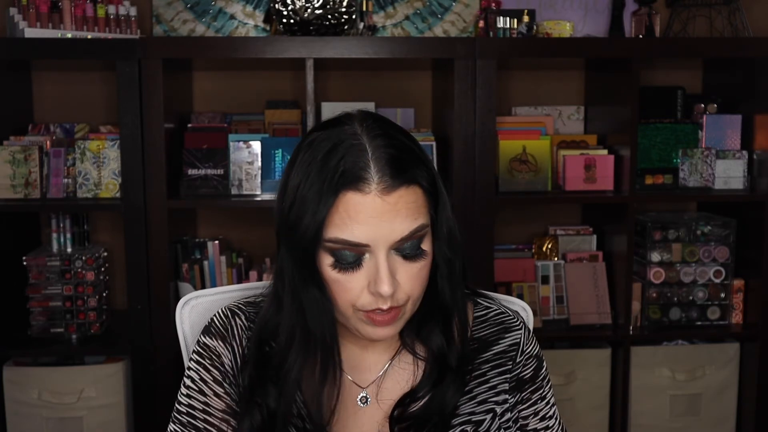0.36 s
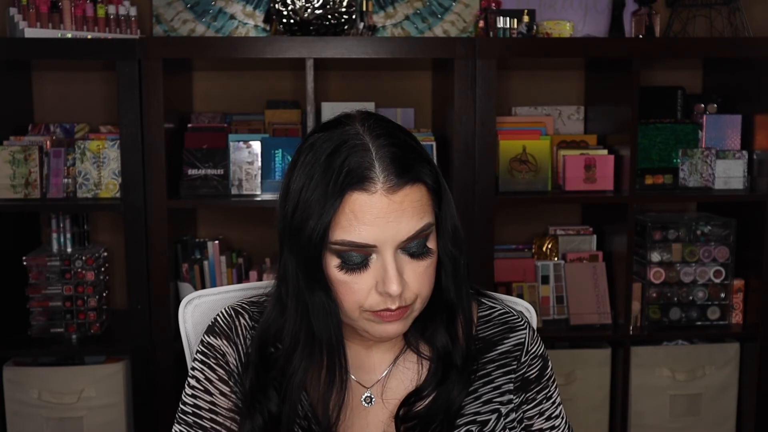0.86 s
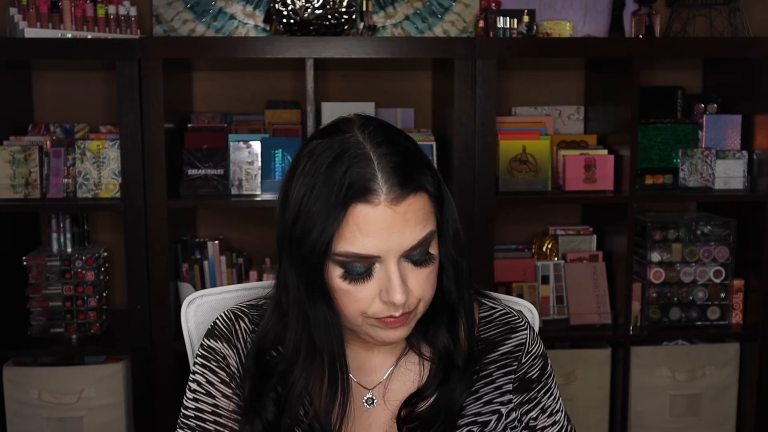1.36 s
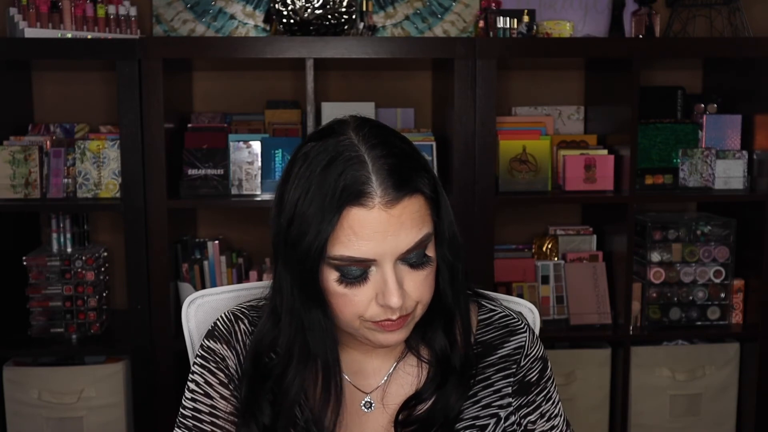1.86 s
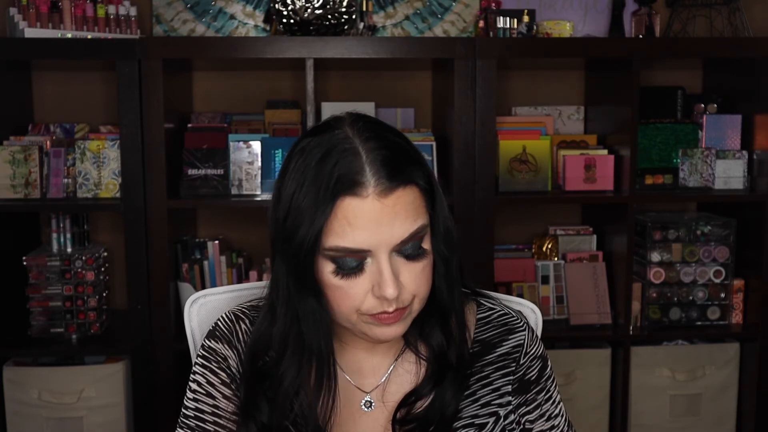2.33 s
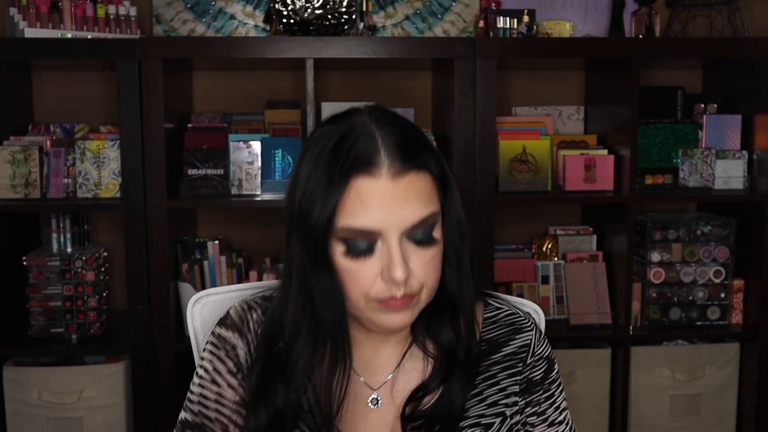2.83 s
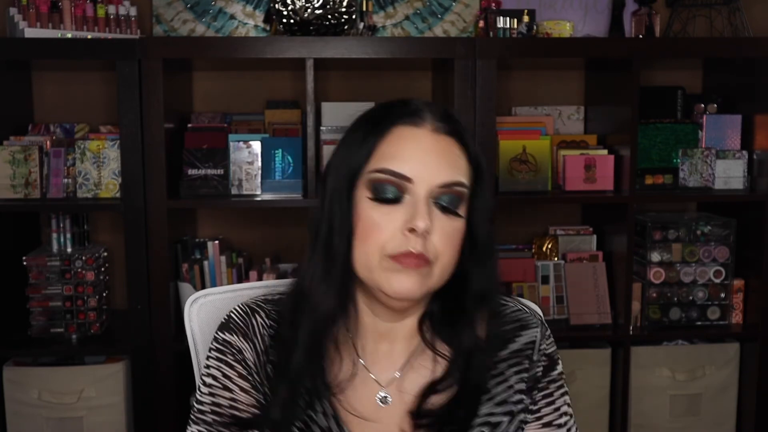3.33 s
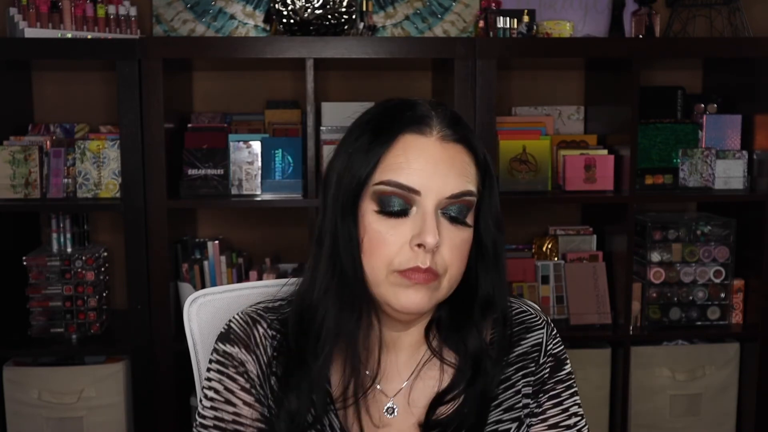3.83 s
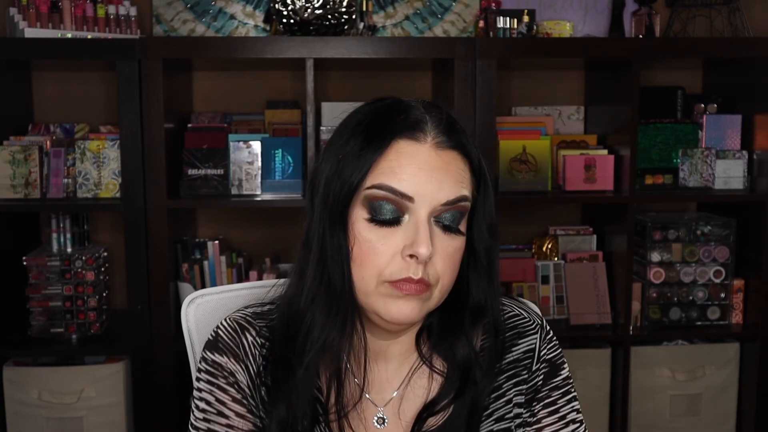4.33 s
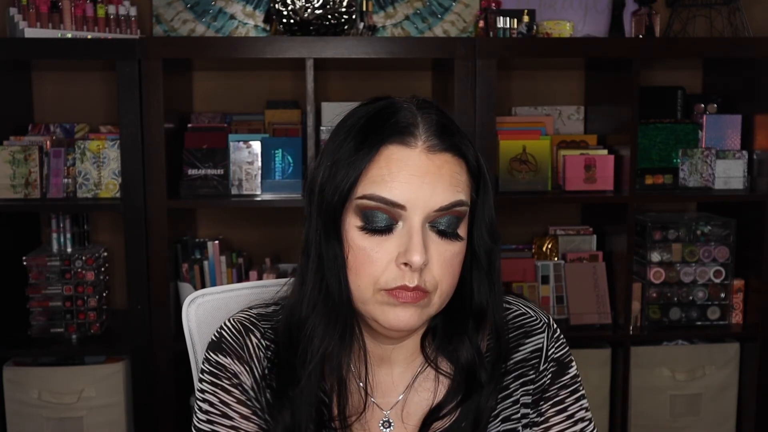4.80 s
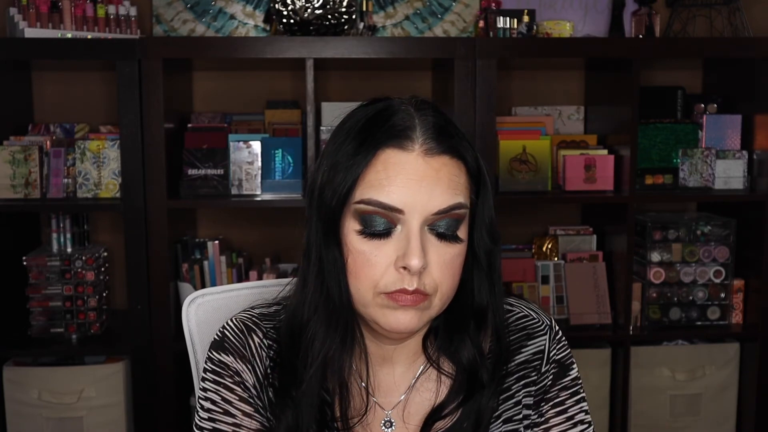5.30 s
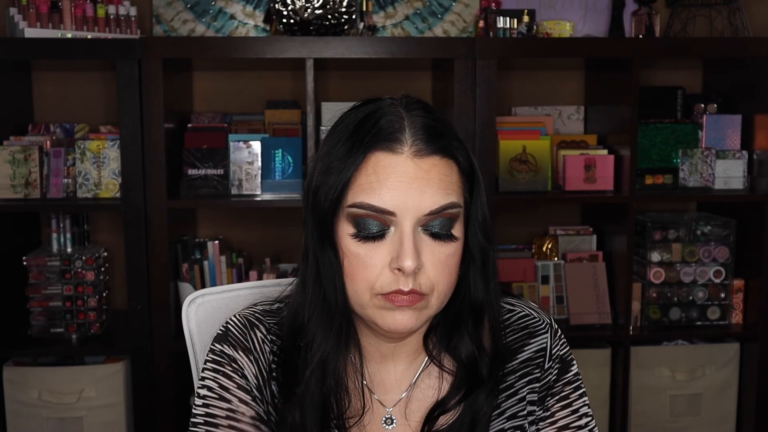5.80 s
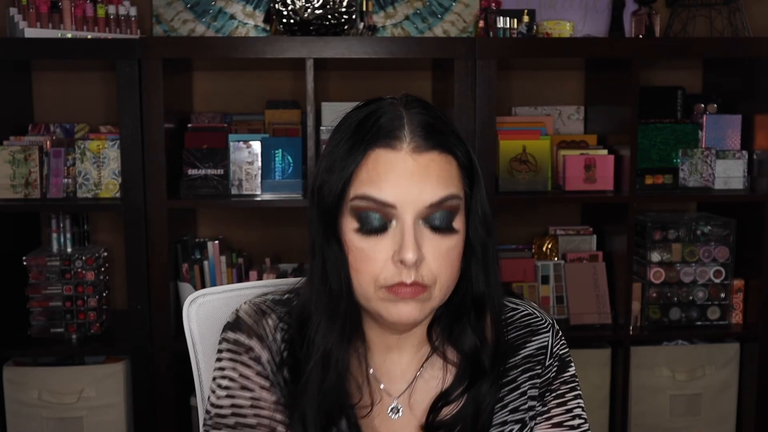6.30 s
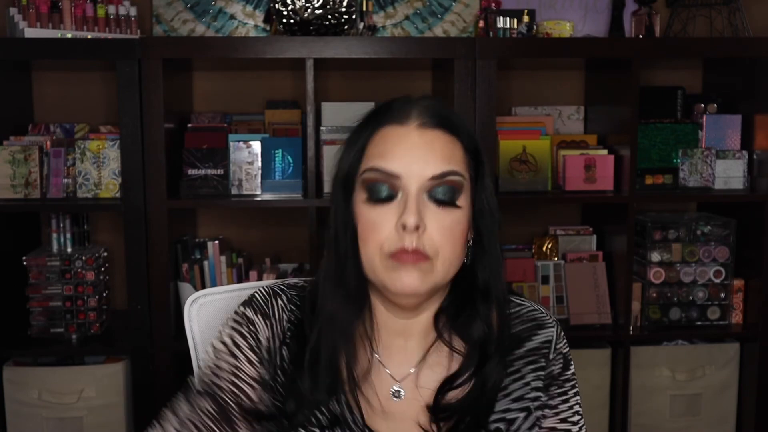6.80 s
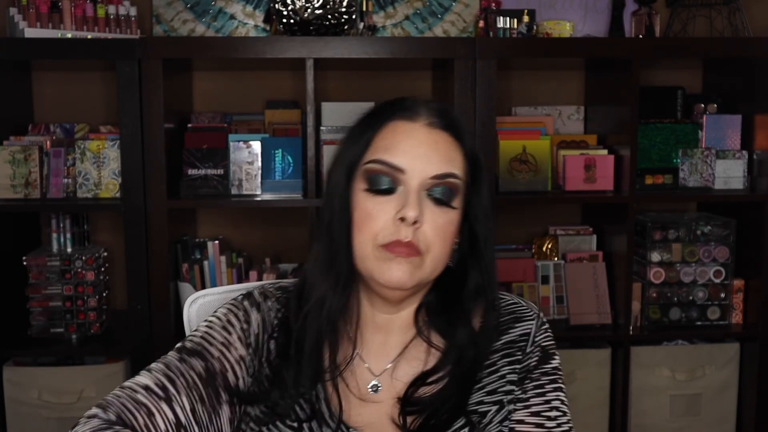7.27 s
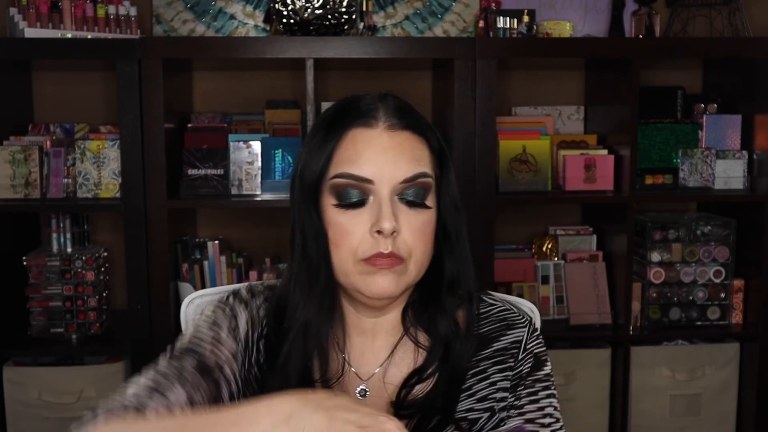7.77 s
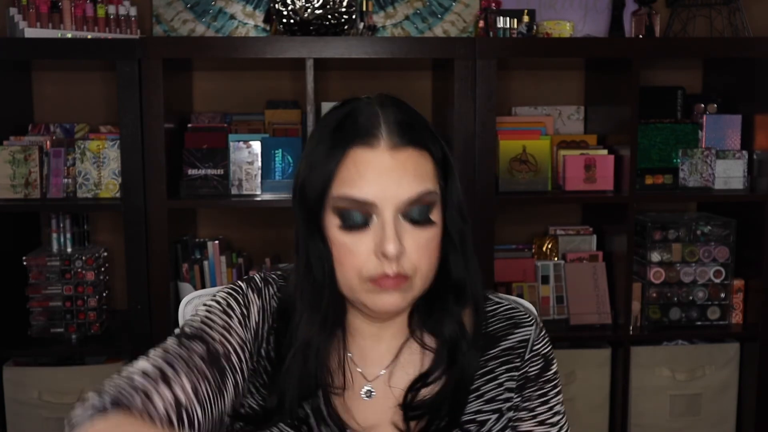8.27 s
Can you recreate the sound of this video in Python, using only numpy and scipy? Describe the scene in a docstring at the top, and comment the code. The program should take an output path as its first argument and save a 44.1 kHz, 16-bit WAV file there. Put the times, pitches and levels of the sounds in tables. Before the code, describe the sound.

Close dry packaging rustle with sharp clicks, peaking in a dense flurry of snaps and box knocks, then near quiet and a small plastic tap.

```python
"""Stiff plastic film crinkles and snaps as hands unwrap a small palette near a mono microphone in a furnished room.
The card box knocks, scuffs and bumps the desk; the plastic case is dragged a little and set down.
Rustle is dense damped pops and filtered clicks, snaps and rubs are noise bursts ringing film and box, bumps are
low sines, drag and taps ring the case. The room answers for a third of a second; the loudest snaps clip.
Under it all lie filtered noise as room rumble and preamp hiss, a mains hum and a thin sine whine."""
import sys
import numpy as np
from scipy import signal
from scipy.fft import rfft, irfft, next_fast_len
from scipy.io import wavfile

SR = 44100
rng = np.random.default_rng(int(sys.argv[2]) if len(sys.argv) > 2 else 0)


def unload_audio(sound):
    """Save the sound as a 16-bit wav file, at the path given as the first command line argument."""
    columns = np.transpose(np.atleast_2d(sound))
    # keep every value between -1 and 1, then stretch to whole-number steps
    steps = np.round(np.clip(columns, -1, 1) * 32767)
    wavfile.write(sys.argv[1], SR, steps.astype(np.int16))


def magnitude_from_level(level_db):
    """Linear magnitude for a level in decibels (20 dB per decade)."""
    exponent = np.asarray(level_db, float) / 20
    return 10 ** exponent


N = 381068  # length in samples

# Source levels are those ahead of the mix and the microphone; shares and colours are relative.
# finger strokes that crumple the film: (time of peak [s], rise [s], level [dB], pitch [Hz], fizz share [dB])
STROKES = [(0.0, .05, -32, 4370, -10), (.142, 0.18, -36, 4950, -12), (.2, 0.24, -37.5, 4900, 4.5),
           (0.264, 0.067, -28, 3770, -5.5), (.356, 0.11, -40, 4000, -24), (.508, 0.42, -40, 3430, -4),
           (.57, 0.24, -38, 2400, -25), (0.648, 0.14, -35, 3540, -19), (.714, 0.22, -29, 3970, -4),
           (.8, 0.24, -33, 2800, -11), (1.075, 0.16, -28, 3370, -10), (1.093, 0.015, -17, 3570, -30),
           (1.125, 0.051, -20, 3800, -14), (1.445, 0.072, -51, 2310, 2), (1.481, 0.19, -35, 4130, 4),
           (1.55, 0.29, -41, 2900, -1), (1.623, 0.57, -36.5, 4300, -6), (1.703, 0.0076, -32.5, 3320, -25),
           (1.813, 0.15, -35.5, 4350, -3), (1.917, 0.11, -35.5, 2600, -3), (1.995, 0.17, -29.5, 3940, -6),
           (2.023, 0.008, -18, 4800, -20), (2.179, 0.077, -33, 4050, -20), (2.235, 0.0067, -24, 2660, -31),
           (2.441, 0.14, -26, 3900, -5), (2.495, 0.29, -27, 4130, -20), (2.547, 0.015, -24, 3570, -30),
           (2.637, 0.13, -25, 4500, -11), (2.71, 0.26, -30, 4100, -7), (2.861, 0.096, -26.5, 2740, -10),
           (2.958, 0.15, -24, 4000, -2), (3.039, 0.011, -24.5, 2870, 2), (3.125, .3, -26, 3080, -3),
           (3.27, 0.011, -33, 3740, -3), (3.355, 0.032, -24, 3300, -4), (3.568, 0.64, -40.5, 4500, -19),
           (3.808, 0.088, -25.5, 5300, -16), (3.959, 0.017, -30, 1550, -23), (4.0, .03, -49, 3000, -12),
           (4.04, 0.049, -36, 3370, -20), (4.102, 0.3, -30.5, 4350, -11), (4.27, .4, -42.5, 4220, -20),
           (4.342, 0.17, -47.5, 5060, 6), (4.412, 0.16, -40.5, 2860, -21), (4.545, 0.0084, -15, 4200, -2.5),
           (4.568, 0.018, -14.5, 3520, -5), (4.595, 0.035, -15.5, 3920, -7),
           (4.625, 0.057, -13.5, 4730, -4), (4.655, .04, -15, 3000, -7), (4.684, 0.061, -17, 1700, -18),
           (4.712, 0.056, -20.5, 1730, -24), (4.83, 0.039, -24.5, 3150, -18),
           (4.922, 0.048, -23, 2880, -20), (4.96, 0.08, -21, 3930, -6), (5.034, 0.18, -35, 4800, -1),
           (5.096, 0.024, -24, 3100, -12), (5.19, 0.023, -23, 4500, -10), (5.272, 0.12, -31, 4920, -9),
           (5.35, 0.35, -32, 4930, -9), (5.435, 0.07, -32.5, 4200, -12), (5.485, 0.037, -33.5, 4500, -5),
           (5.55, 0.13, -49, 4400, -8), (5.598, 0.086, -28, 5040, -5), (5.65, .1, -47, 4970, -7),
           (5.738, 0.0071, -22.5, 6000, -7), (5.81, .2, -35, 5000, -10), (5.991, 0.36, -30, 5230, -25),
           (6.07, .2, -34, 5400, -5), (6.14, 0.14, -35, 4110, 0), (6.181, 0.024, -25.5, 1620, -27),
           (6.222, 0.0087, -15, 2040, -13), (6.396, .4, -31.5, 4130, -5), (6.45, 0.065, -26, 3350, -7),
           (6.551, 0.018, -20.5, 2000, -8), (6.747, 0.16, -39, 3980, -3), (6.8, 0.11, -42, 3800, -12),
           (6.99, 0.11, -48.5, 3700, -14), (7.115, 0.27, -47, 1550, 2), (7.205, 0.15, -46.5, 2590, 3),
           (8.187, 0.2, -42.5, 3880, -17), (8.333, 0.33, -51, 2090, -17), (8.41, 0.31, -45, 2080, -20),
           (8.51, 0.23, -44, 2630, -21)]
# fingers scuff the card box: (time of peak [s], rise [s], level [dB])
SCUFFS = [(0.549, .5, -43), (1.095, 0.027, -17), (1.47, 0.19, -37.5), (1.71, .02, -43), (1.995, 0.18, -34),
          (2.72, 0.092, -33), (2.77, .1, -48), (3.125, 0.11, -37), (3.355, 0.075, -29), (3.55, .5, -46),
          (3.93, 0.65, -38.5), (4.41, 0.35, -61), (4.56, .015, -33), (4.62, .05, -25), (4.665, .05, -20),
          (4.71, .06, -17.5), (4.9, 0.33, -28), (5.06, .4, -33.5), (5.35, .3, -42), (5.485, .06, -48),
          (5.737, 0.017, -40), (6.015, 0.047, -27), (6.155, 0.14, -35), (6.237, 0.037, -15.5),
          (6.535, .4, -42), (7.46, .5, -54), (8.34, 0.24, -47), (8.42, 0.43, -44.5)]
# snaps and knocks: (time [s], peak level [dB], ring [Hz], card share [dB], fizz share [dB])
SNAPS = [(0.031, -26, 2430, -10, -1), (.193, -32, 5700, -31, -12), (.47, -27, 3100, -25, -38),
         (.705, -27, 5270, -19, -19), (.758, -25, 1300, -24, -1), (1.053, -30, 3260, -10, -10),
         (1.086, 0, 2030, -13, -14), (1.343, -40, 580, 18, -38), (1.43, -48, 1720, -17, -38),
         (1.437, -26, 1930, -16, -4), (1.522, -27, 1820, -12, 0), (1.555, -28, 2970, -15, -13),
         (1.709, -25.5, 1060, -8, -11), (1.801, -30, 5430, -11, -8), (1.923, -23, 1460, -10, -38),
         (2.004, -1.5, 3830, -26, -21), (2.227, -9, 3060, -15, -59), (2.389, -37, 4100, 1, -24),
         (2.183, -41, 595, -21, -25), (2.441, -16.5, 3870, -25, -26), (2.537, -5, 4320, -20.5, -54),
         (2.835, -26.5, 2780, -23, -16), (2.857, -24, 3100, -8.5, -11), (2.998, -18, 4900, -27, 0),
         (3.264, -33, 5840, -15, -27), (3.275, -28.5, 1020, -39, -22), (3.337, -19.5, 980, -22, -14),
         (3.759, -24.5, 4500, -25, -6), (3.956, -23, 1240, 13, -30.5), (4.322, -28, 5200, -33, 1.5),
         (4.541, -3, 4760, -11, -35), (4.55, -20, 4490, -25, -26), (4.574, -6.5, 2080, -25, -17),
         (4.636, -3, 6460, -4.5, 2), (4.677, -2.5, 1670, -40, -32), (4.715, -30, 1510, -17, -30),
         (4.768, -22, 4950, -28, -20), (4.79, -7, 4300, -11, -13), (4.823, -11, 614, -10, -13),
         (4.891, 1, 754, -0.5, -2.5), (4.894, 0, 4330, -35, -8), (4.952, -11.5, 4740, -8, -18),
         (4.972, -9, 2780, -9, -9), (5.001, -9.5, 6060, -34, 8), (5.047, -25, 590, -8, -30),
         (5.092, -21, 1164, 2, -16), (5.098, -14, 600, -29, -8), (5.109, -16, 680, 2, 1),
         (5.178, -13, 4760, -13.5, -8), (5.202, -15.5, 3950, -15.5, -5), (5.272, -13, 5080, -11, -31),
         (5.303, -12.5, 5000, -12.5, -36), (5.426, -13.5, 880, -8, -11), (5.439, -30, 1010, -22, -25),
         (5.471, -22.5, 5600, -34, -23), (5.485, -18, 4200, -31, -1), (5.621, -24, 5300, -26, -3),
         (5.628, -11, 4880, -29, -8), (5.655, -13.5, 5720, -12, -26), (5.692, -10.5, 6000, -26, -39),
         (5.74, -9, 6150, -15.5, -16), (5.773, -13.5, 5600, -12.5, -7), (5.826, -14.5, 5180, -7, -6),
         (5.862, -23.5, 1360, -12, -27), (5.914, -13.5, 5250, -10.5, -31), (5.938, -10, 5400, -14.5, -28),
         (5.986, -16.5, 605, -30, -5), (6.05, -22.5, 5780, -17, -31), (6.091, -17, 4600, -13, -6.5),
         (6.217, -6, 970, -15, -23), (6.321, -25.5, 853, -1, -14), (6.37, -27, 1790, -7, -24),
         (6.398, -19.5, 533, -32, -22), (6.411, -14.5, 3920, -12, -8), (6.417, -17, 567, -30, -11),
         (6.45, -23, 2640, -10, -23), (6.505, -21, 3670, -16, -6), (6.545, -6, 480, -1, -12),
         (6.567, -17.5, 820, 14, -31), (7.604, -17, 3580, -1, 1), (7.686, -39, 910, -4, -18)]
# short rubs that swell: (time partway up the swell [s], peak level [dB], ring [Hz], card share [dB], fizz share [dB])
RUBS = [(0.259, -35, 2520, -10, -19), (3.043, -16, 2430, -40, -23), (3.082, -16, 3340, -30, -20),
        (3.116, -13.5, 2960, -46, -29), (3.803, -22, 5740, -28, -31), (3.807, -27, 900, -22, -40),
        (3.823, -18, 5750, -27, -34), (3.826, -24, 850, -20, -40), (4.084, -21, 5100, -0.5, 1),
        (5.645, -17, 4850, -15, -27), (5.707, -21, 5860, -31, -23), (6.165, -10.5, 1880, -7.5, -41)]
# short one-sided low thumps from lopsided clipping of the hardest snaps: (time [s], peak level [dB])
LOPSIDED_CLIPS = [(2.005, -18), (4.542, -25), (4.895, -10)]
# the box bumps the desk: (time [s], starting level [dB], pitch [Hz])
THUDS = [(4.891, -18, 197), (5.1, -19, 254), (5.69, -31, 145), (5.909, -28, 248), (6.214, -22, 194),
         (6.391, -23.5, 258), (6.547, -17.5, 230), (7.605, -30, 325)]
# the plastic case touches the desk: (time [s], peak level [dB])
TAPS = [(7.604, -19), (7.683, -29), (7.692, -35)]
# the plastic case is dragged on the desk: (time [s], level [dB])
DRAG = [(7.02, -51.5), (7.13, -34.5), (7.158, -57), (7.19, -40), (7.208, -43), (7.238, -67), (7.26, -66)]
# broad resonances of the film: (frequency [Hz], width [Hz], level [dB])
FILM_MODES = [(1840, 950, 14.5), (3620, 2250, 14), (5600, 1570, 15.5)]
# resonances of the card box: (frequency [Hz], width [Hz], level [dB])
CARD_MODES = [(341, 197, -3.5), (619, 115, 1), (733, 274, 0.5), (1195, 624, -0.5)]
# the finest creases when they snap: (frequency [Hz], width [Hz], level [dB])
FIZZ_MODES = [(7300, 18000, 14), (12500, 8100, 10.5), (14500, 1100, -6)]
# resonances of the plastic case: (frequency [Hz], width [Hz], level [dB])
CASE_MODES = [(1100, 45, 0.5), (1360, 110, -0.5), (2390, 120, -8), (3000, 200, -6), (4300, 200, -10),
              (5750, 210, -8)]
# rustle of the finest creases: (frequency [Hz], density [dB per Hz])
FINE_COLOUR = [(5000, -31), (7000, 5), (8500, -1.5), (12000, 8), (15500, -2), (18000, -28)]
# decay of the room: (frequency [Hz], time to fall 60 dB [s])
ROOM_DECAY = [(200, 0.23), (1400, 0.15), (3700, 0.25), (9700, 0.44)]
# colour of the room's answer: (frequency [Hz], level [dB])
WALLS = [(150, -4.5), (500, 4), (2000, -4), (6000, -6), (8500, -12.5), (16000, -4)]
# response of the microphone: (frequency [Hz], level [dB])
MIC = [(40, -2.5), (5500, 6), (8000, 4), (16000, -11.5)]
# colour of rumble and hiss: (frequency [Hz], density [dB per Hz])
FLOOR_COLOUR = [(15, -30), (30, -36), (50, -5), (100, 0), (300, -4.5), (700, -10.5), (1500, -25),
                (5000, -18.5), (9000, -23.5), (13000, -25), (16000, -31.5)]
# mains hum: (frequency [Hz], width of each of two filter passes [Hz], level [dB rms])
HUM = (46.6, 8.1, -60.5)
# electronic whine: (frequency [Hz], level [dB rms])
WHINE = (9921, -69.5)

# Film movements: swell during the rise, fast break-off, then a weaker part that settles slowly.
RISE_DB, LET_GO_DB_PER_S, SETTLE_DB_PER_S, SETTLE_DB = 20, 289, 150.5, -5
ONSET = 4  # silence gives way within 1 / ONSET of a rise, just before the rise
FIZZ_QUICKER, CARD_QUICKER = 1.23, 1.7  # how much faster fizz and card swell and die than the film
# hands merely holding
REST_FILM_DB, REST_HZ, REST_CARD_DB, REST_FIZZ_DB = -57, 2500, -51, -71
CARD_SHARE_DB = -13  # crumpled film also stirs the box
# room share of a 0 dB snap ahead of the mix; dB more for each dB that a snap is softer
SNAP_ROOM_DB, SOFT_GAIN = -4, 0.36
RUB_RISE_S, CLIP_RISE_S = 0.0048, 0.00062


def unit(x):
    """Rms 1 along the last axis."""
    return x / np.sqrt(np.mean(np.abs(x) ** 2, axis=-1, keepdims=True) + 1e-20)


def along(points, hz):
    """Reads (frequency, value) points on a log frequency axis."""
    f, v = np.transpose(points)
    return np.interp(np.log(hz + 1), np.log(f + 1), v)


def filtered(x, response):
    """Applies a complex response of frequency to x."""
    m = next_fast_len(x.shape[-1] + 8192)
    spectrum = rfft(x, m) * response(np.fft.rfftfreq(m, 1 / SR))
    return irfft(spectrum, m)[..., :x.shape[-1]]


def peak(f, hz, width_hz):
    """One causal resonance."""
    return 1j * f * width_hz / (hz * hz - f * f + 1j * f * width_hz + 1e-9)


def body(modes):
    """Response of a body with several resonances of alternating polarity."""
    return lambda f: sum((-1) ** k * magnitude_from_level(db) * peak(f, hz, width)
                         for k, (hz, width, db) in enumerate(modes))


def coloured(points):
    """Response that follows a (frequency, dB) curve."""
    return lambda f: magnitude_from_level(along(points, f))


def placed(s, rows):
    """Rows of sound laid out at their start times."""
    at = np.round(s * SR).astype(int) + np.arange(rows.shape[1])
    return np.bincount(at.ravel(), rows.ravel(), N + rows.shape[1])[:N]


def ticks(count, scatter_db):
    """Random clicks of either sign, a few much larger than the rest, rms 1."""
    draw = rng.random((count, 3))
    size = magnitude_from_level(-scatter_db * np.log(draw[:, 1] + 1 / 200)) * np.sign(draw[:, 2] - .5)
    return unit(np.bincount((draw[:, 0] * N).astype(int), size, N))


def creases(pitch_hz, count, spread, turns, scatter_db):
    """Creases of film pop as short damped sines scattered about the present pitch."""
    draw, t = rng.random((count, 2)), np.arange(128) / SR
    start = (draw[:, 0] * N).astype(int)
    hz = pitch_hz[start] * np.exp(spread * rng.standard_normal(count))
    hz = np.clip(hz, 800, 9000)[:, None]
    size = magnitude_from_level(-scatter_db * np.log(draw[:, 1:] + 1 / 200))
    grain = size * np.sin(2 * np.pi * hz * t) * np.exp(-hz * t / turns)
    at = start[:, None] + np.arange(128)
    return unit(np.bincount(at.ravel(), grain.ravel(), N + 128)[:N])


def movements(s, rise, db, quicker=1):
    """Power of each movement, one value a millisecond: it swells to its peak, breaks off and settles."""
    t = np.arange(N * 1000 // SR + 2) / 1000 - s
    after = np.maximum(t, 0) * quicker
    fall = np.maximum(-LET_GO_DB_PER_S * after, SETTLE_DB - SETTLE_DB_PER_S * after)
    early = np.minimum(t, 0) / np.maximum(rise, 1 / 500)  # in rises, negative before the peak
    onset = np.clip(ONSET * (early + 1) + 1, 0, 1)
    return magnitude_from_level(db + fall + quicker * RISE_DB * early) ** 2 * onset


def crinkle():
    """Film, card and fine creases rustle as the fingers move; stronger strokes weigh more in the pitch."""
    s, rise, db, hz, fizz_db = np.transpose(STROKES)[..., None]
    strokes, rest = movements(s, rise, db), magnitude_from_level(REST_FILM_DB) ** 2
    film_power = strokes.sum(0) + rest
    pitch_hz = ((strokes * hz).sum(0) + rest * REST_HZ) / film_power

    scuffs = movements(*np.transpose(SCUFFS)[..., None], CARD_QUICKER).sum(0)
    card_power = scuffs + magnitude_from_level(CARD_SHARE_DB) ** 2 * film_power + magnitude_from_level(REST_CARD_DB) ** 2
    fizz_power = movements(s, rise, db + fizz_db, FIZZ_QUICKER).sum(0) + magnitude_from_level(REST_FIZZ_DB) ** 2

    def per_sample(curve):  # from one value a millisecond
        return np.interp(np.arange(N) * 1000 / SR, np.arange(len(curve)), curve)

    pops = creases(per_sample(pitch_hz), count=36000, spread=0.376, turns=2.2, scatter_db=3.0)
    sheet = unit(filtered(ticks(count=50000, scatter_db=4.0), body(FILM_MODES)))
    film = unit(pops + 0.8 * sheet)
    card = unit(filtered(ticks(count=12000, scatter_db=3.5), body(CARD_MODES)))
    fizz = unit(filtered(ticks(count=60000, scatter_db=8.0), coloured(FINE_COLOUR)))
    layers = [(film_power, film), (card_power, card), (fizz_power, fizz)]
    return sum(per_sample(np.sqrt(power)) * layer for power, layer in layers)


def contacts(rows, envelope, room_db):
    """A burst of slips rings its own fold, the whole sheet and the box; returns what microphone and walls get."""
    s, db, ring_hz, card_db, fizz_db = rows
    shares_db = [-1.5, -3, card_db + 6, fizz_db + 3.0]

    def mix(x, fold):
        parts = [fold, body(FILM_MODES), body(CARD_MODES), body(FIZZ_MODES)]
        return sum(magnitude_from_level(share) * unit(filtered(x, part)) for part, share in zip(parts, shares_db))

    slips = envelope * rng.standard_normal(envelope.shape)
    direct = mix(slips, lambda f: peak(f, ring_hz, 400 + 0.12 * ring_hz) ** 2)
    direct = magnitude_from_level(db) * direct / np.abs(direct).max(axis=1, keepdims=True)
    # summed over all directions a contact has a broader, more even colour
    click = np.ones_like(s) * (np.arange(envelope.shape[1]) == 0)
    even = mix(click, lambda f: peak(f, ring_hz, 900 + 0.7 * ring_hz) ** 2)
    spread = unit(unit(even) + 1.25 * unit(direct))
    spread = magnitude_from_level(room_db) * spread * np.std(direct, axis=1, keepdims=True)
    return np.array([placed(s, direct), placed(s, spread)])


def snaps():
    """Creases give way at once and are spent in a few ms; soft ones face away and sound roomier."""
    rows = np.transpose(SNAPS)[..., None]
    t = np.ones_like(rows[0]) * np.arange(2048) / SR
    envelope = magnitude_from_level(-60 * t / 0.013) * (1 - np.exp(-t / 0.00015))
    return contacts(rows, envelope, SNAP_ROOM_DB - SOFT_GAIN * rows[1])


def rubs():
    """Film slides on film: the contact builds up, then lets go."""
    s, *rows = np.transpose(RUBS)[..., None]
    u = np.ones_like(s) * np.arange(4096) / SR / RUB_RISE_S
    return contacts([s - RUB_RISE_S / 2, *rows], u * np.exp(-u * u / 2), room_db=-7.0)


def lopsided_clips():
    """Lopsided clipping of the hardest snaps adds a short one-sided low thump."""
    s, db = np.transpose(LOPSIDED_CLIPS)[..., None]
    u = np.arange(1024) / SR / CLIP_RISE_S
    return placed(s, magnitude_from_level(db) * u * np.exp(1 - u))


def thuds():
    """Soft contacts of box and desk: a few low cycles that die at once."""
    s, db, hz = np.transpose(THUDS)[..., None]
    t = np.arange(4096) / SR
    onset = 1 - np.exp(-t / 0.0014)
    return placed(s, magnitude_from_level(db - 60 * t / 0.055) * np.sin(2 * np.pi * hz * t) * onset)


def taps():
    """A brief contact rings the resonances of the case."""
    s, db = np.transpose(TAPS)[..., None]
    t = np.arange(4096) / SR
    burst = magnitude_from_level(-60 * t / .006) * rng.standard_normal((len(s), len(t)))
    ring = filtered(burst, body(CASE_MODES))
    return placed(s, magnitude_from_level(db) * ring / np.abs(ring).max(axis=1, keepdims=True))


def drag():
    """Tiny slips on the desk excite the resonances of the case."""
    s, db = np.transpose(DRAG)
    level_db = np.interp(np.arange(N) / SR, s, db, left=-120, right=-120)
    return magnitude_from_level(level_db) * unit(filtered(ticks(count=15000, scatter_db=3.0), body(CASE_MODES)))


def room(x, size=2048):
    """Each frequency dies at its own speed; the hands move, so successive blocks meet 48 tails in turn."""
    pieces = np.pad(x, (0, -N % size)).reshape(-1, size)
    noise = rng.standard_normal((48, SR // 3))
    hz, t, z = signal.stft(noise, SR, nperseg=256)
    decay = magnitude_from_level(-60 * t / along(ROOM_DECAY, hz)[:, None])
    tails = signal.istft(z * decay, SR, nperseg=256)[1]
    # the echoes need some ms to build up
    tails = tails * np.clip(np.arange(tails.shape[1]) / SR / 0.0034, 0, 1)
    tails = tails / np.linalg.norm(tails, axis=1, keepdims=True)
    tails = tails[np.arange(len(pieces)) % len(tails)]
    start_s = size * np.arange(len(pieces))[:, None] / SR
    wet = placed(start_s, signal.fftconvolve(pieces, tails, axes=1))
    return filtered(wet, coloured(WALLS))


def floor():
    """Rumble and hiss are shaped noise, the unsteady hum is narrow noise, the thin whine a steady sine."""
    def noise(response):
        return unit(filtered(rng.standard_normal(N), response))

    hum_hz, hum_width_hz, hum_db = HUM
    whine_hz, whine_db = WHINE
    hum = magnitude_from_level(hum_db) * noise(lambda f: peak(f, hum_hz, hum_width_hz) ** 2)
    whine = magnitude_from_level(whine_db) * np.sqrt(2) * np.sin(2 * np.pi * whine_hz * np.arange(N) / SR)
    return magnitude_from_level(-47) * noise(coloured(FLOOR_COLOUR)) + hum + whine


def scene():
    """The handling, near and by way of the room, through one capsule; both channels are alike."""
    rustle = crinkle() + drag()
    direct, spread = snaps() + rubs()
    bumps = thuds() + taps()
    answer = room(magnitude_from_level(-8.5) * rustle + magnitude_from_level(3.0) * spread + magnitude_from_level(3.5) * bumps)
    at_mic = magnitude_from_level(-7.0) * rustle + direct + bumps + lopsided_clips() + answer
    mono = filtered(at_mic, coloured(MIC)) + floor()
    return np.array([mono, mono])


def roll_off(x):
    """The treble ends steeply here."""
    return signal.sosfilt(signal.butter(12, 16490, fs=SR, output="sos"), x)


def record(dry):
    """The converter clips at full scale."""
    clipped = np.clip(dry, -1, 1)
    return roll_off(clipped)


dry = scene()
out = record(dry)
unload_audio(out)
```